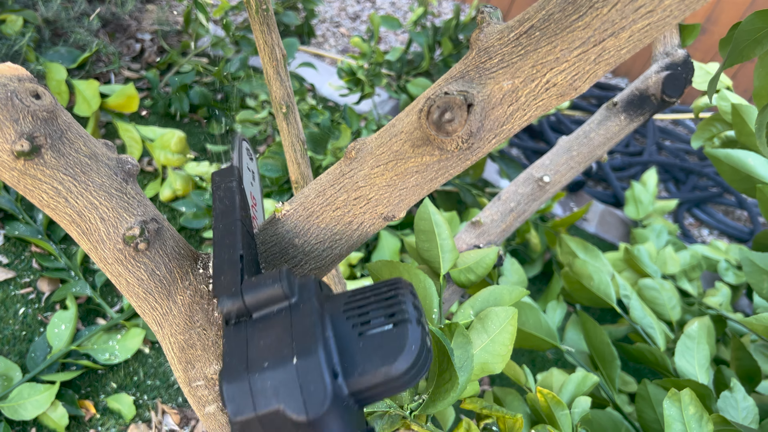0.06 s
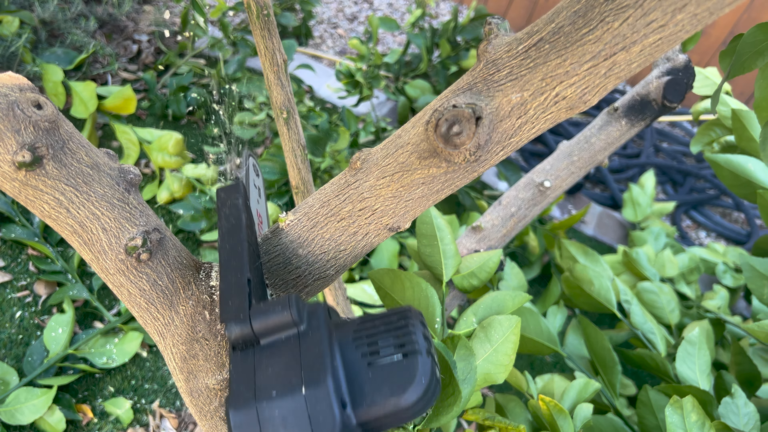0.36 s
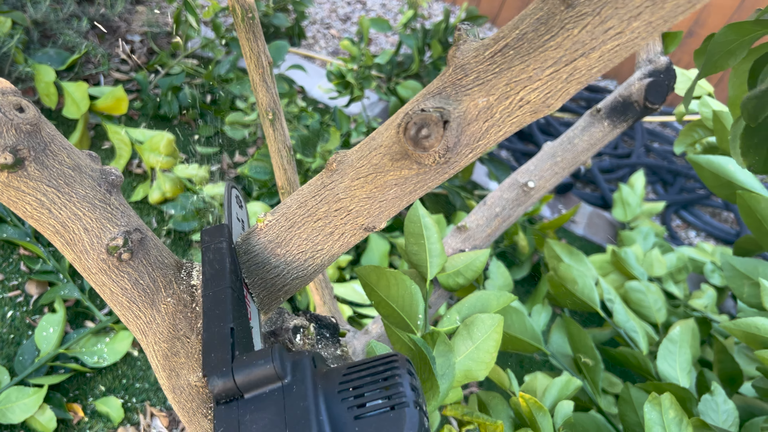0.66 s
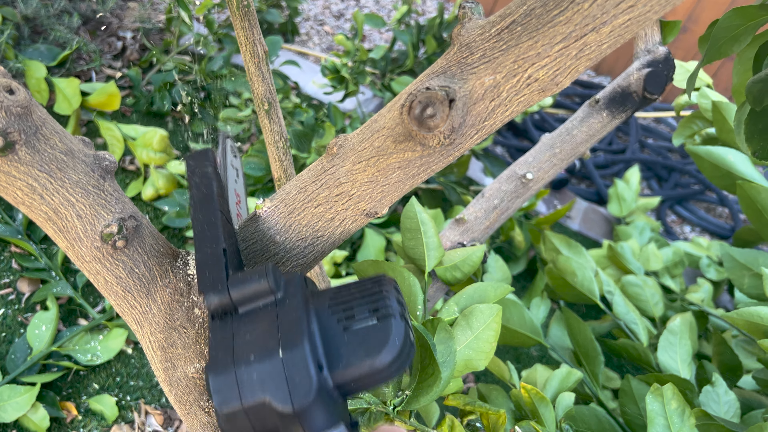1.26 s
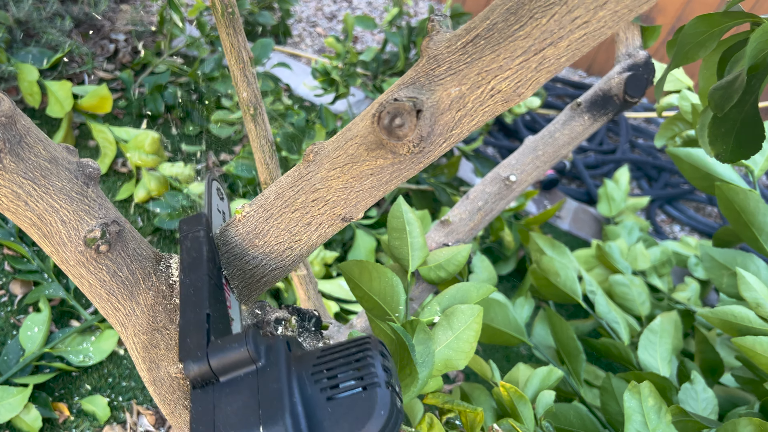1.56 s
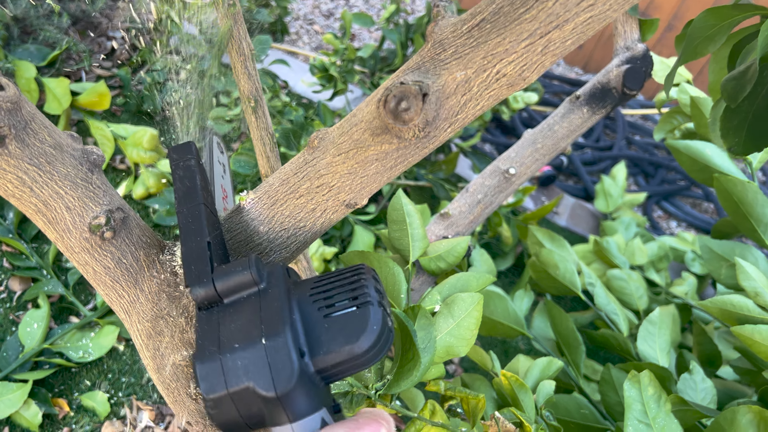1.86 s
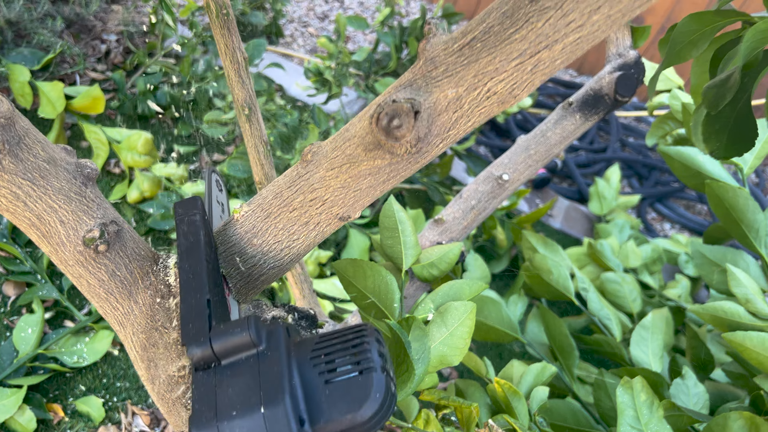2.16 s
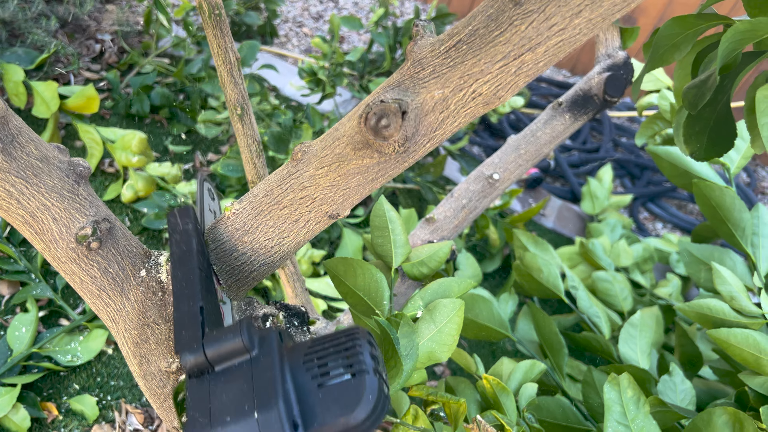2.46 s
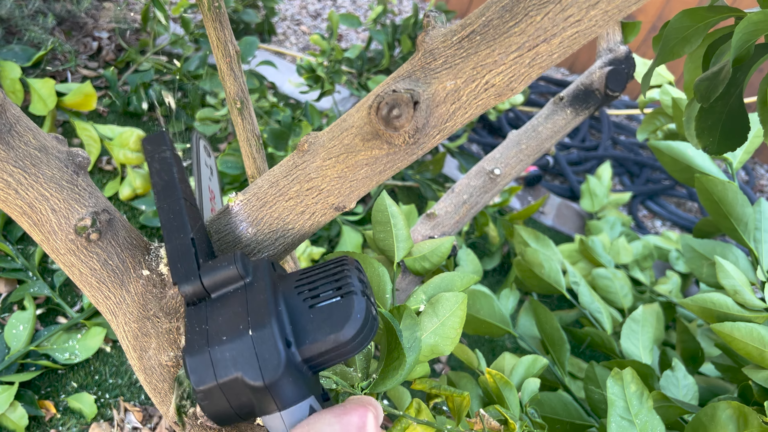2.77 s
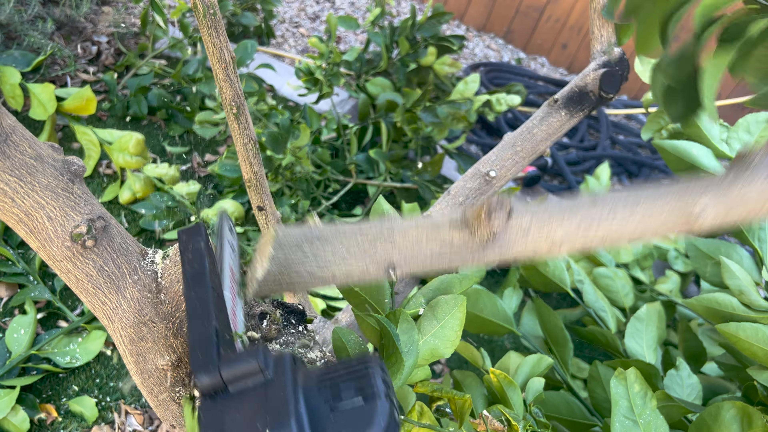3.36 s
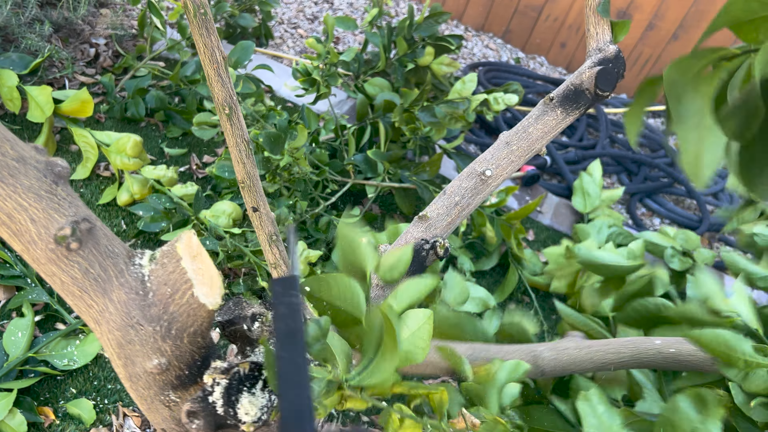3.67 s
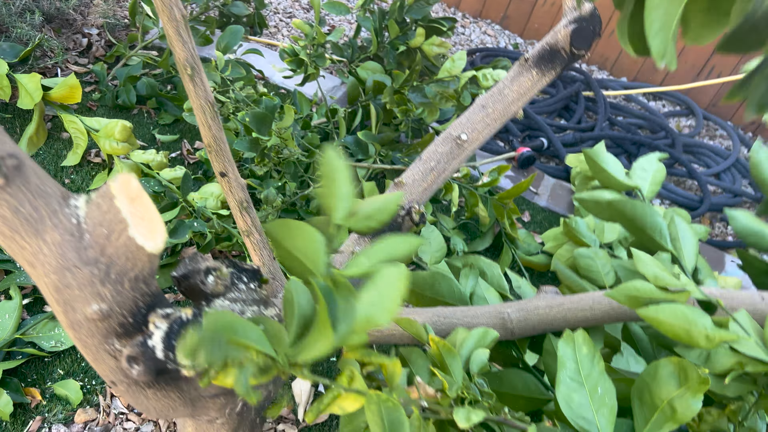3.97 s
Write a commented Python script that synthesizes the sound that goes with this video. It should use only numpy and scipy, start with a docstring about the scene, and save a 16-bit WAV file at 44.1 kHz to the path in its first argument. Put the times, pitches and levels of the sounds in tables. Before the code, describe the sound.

A small electric chainsaw rasps through a branch, which cracks and drops with a knock.

```python
"""Electric chainsaw cutting a branch

Close by in a garden, the chain of a small saw rattles round its bar. The cutters bite about thirty
times a second; each bite rasps, jolts the saw and drags the gear whine down. The last fibres crack,
the chain runs free and coasts down, and the branch drops with a hollow knock."""
import sys
import numpy as np
from scipy import signal
from scipy.fft import rfft, irfft, next_fast_len
from scipy.io import wavfile

SR = 44100
rng = np.random.default_rng(int(sys.argv[2]) if len(sys.argv) > 2 else 0)


def inscribe(sig):
    """Save sig as 16-bit PCM at rate SR to the path in sys.argv[1].

    A 1-D sig is mono; a 2-D sig holds one channel per row.
    Samples are clipped to [-1, 1] before scaling.
    """
    pcm = np.round(np.clip(np.atleast_2d(sig).T, -1, 1) * 32767)
    wavfile.write(sys.argv[1], SR, pcm.astype(np.int16))


N = 176400
T = np.arange(N) / SR
SIZE = next_fast_len(N + 8192)
HZ = np.fft.rfftfreq(SIZE, 1 / SR)
THROUGH_S, RELEASE_S = 3.385, 0.032  # end of the cut; fade of the load just before it


def amp(db):
    """Decibels to amplitude ratio."""
    return 10 ** (np.asarray(db) / 20)

def unit(x):
    """Normalisation to rms 1."""
    return x / np.sqrt(np.mean(x ** 2) + 1e-20)

def curve(rows, column=1):
    """Linear interpolation of a time table at every sample."""
    rows = np.array(rows)
    return np.interp(T, rows[:, 0], rows[:, column])

def per_bin(points):
    """Interpolation of a table over log frequency."""
    hz, value = np.transpose(points)
    return np.interp(np.log(HZ + 1), np.log(hz + 1), value)

def filtered(x, gain):
    """Filtering as multiplication of the spectrum."""
    return irfft(rfft(x, SIZE) * gain, SIZE)[..., :N]

def colour(x, spectrum):
    """Spectral shaping, at rms 1."""
    return unit(filtered(x, amp(per_bin(spectrum))))

def wander(hz):
    """Low-pass noise: a smooth random fluctuation of rms 1."""
    return unit(filtered(rng.standard_normal(N), np.exp(-(HZ / hz) ** 2)))

def clicks(per_s, spread_db):
    """Shot noise: two independent trains of uneven impulses."""
    size = amp(spread_db * np.minimum(rng.exponential(1, (2, N)), 5))
    return unit(size * rng.choice([-1, 1], (2, N)) * (rng.random((2, N)) < per_s / SR))

def strikes(times, sizes, shape):
    """Convolution: each impulse sets off the same response."""
    train = np.zeros(N)
    np.add.at(train, np.clip(np.round(np.asarray(times) * SR).astype(int), 0, N - 1), sizes)
    return signal.fftconvolve(train, shape[:SR // 2])[:N]

def burst(rise_s, decay_s):
    """Linear attack and exponential decay."""
    return np.minimum(T / rise_s, 1) * np.exp(-np.maximum(T - rise_s, 0) / decay_s)

def arch(length_s):
    """A rounded pulse from 0 to 1 and back."""
    return np.sqrt(abs(np.sin(np.pi * np.minimum(T / length_s, 1))))

def ring(hz, db, t60, rise_s):
    """Free vibration of one damped mode."""
    return amp(db) * burst(rise_s, t60 / np.log(1000)) * np.sin(2 * np.pi * hz * T)

def resonate(x, hz, width_hz):
    """Forced vibration of a resonator with moving centre frequency, at rms 1."""
    carrier = np.exp(2j * np.pi * np.cumsum(hz) / SR)
    pole = np.exp(-np.pi * width_hz / SR)
    return unit((carrier * signal.lfilter([1 - pole], [1, -pole], x / carrier)).real)


# Spectrum of the garden air. Each row: frequency in Hz, relative level in dB.
AIR = [(20, -39), (55, -8.5), (110, 15), (250, -20), (1000, 13), (15000, -2)]

def garden_air(db=-48.5):
    """Ambient sound as stationary coloured noise."""
    return amp(db) * colour(rng.standard_normal((2, N)), AIR)


# The branch lands and rocks. Each row: start in seconds, level in dB.
KNOCKS = [(3.6448, -18), (3.713, -47)]
# Its modes. Each row: frequency in Hz, level in dB, T60 in seconds, rise in seconds.
BRANCH_MODES = [(427, 3, 0.047, 0.0022), (354.7, -15, .04, 0.0014), (184, -9.5, 0.15, 0.0032),
                (88.5, -13, 0.12, 0.017), (805, -5, 0.027, 0.00083)]

def falling_branch():
    """Impact excites the damped modes of the cut limb."""
    times, db = np.transpose(KNOCKS)
    return strikes(times, amp(db), sum(ring(*mode) for mode in BRANCH_MODES))


# The hardest bites of the cutters. Each row: start in seconds, rasp in dB, chip hiss in dB.
HARD_BITES = [(0.067, -14, -22), (0.198, -22, -16.5), (0.27, -19.5, -20), (0.348, -19, -19),
              (0.545, -21, -30), (0.612, -18, -35), (0.685, -17, -22), (0.709, -17.5, -24),
              (0.763, -18, -29), (0.786, -16, -31), (0.888, -15.5, -29), (0.929, -11.5, -19),
              (0.978, -15, -30), (0.992, -15, -29), (1.002, -11, -27), (1.014, -15, -20),
              (1.14, -13.5, -23), (1.282, -17, -22), (1.344, -15, -31), (1.367, -16.5, -20),
              (1.393, -12, -24), (1.42, -15, -27), (1.475, -17, -21), (1.52, -17, -27), (2.001, -15.5, -33),
              (2.093, -18.5, -31), (2.27, -17, -29), (2.512, -14, -25), (2.52, -20, -22),
              (2.617, -18.5, -27), (2.879, -17, -19), (2.914, -15.5, -27), (3.011, -26, -19),
              (3.078, -18.5, -17.5), (3.112, -17, -19), (3.15, -22, -22), (3.218, -21.5, -28)]
SOFT_RASP_DB, SOFT_HISS_DB = -24, -33

def cutter_bites(rate_hz=30.84, jitter_s=0.0025, spread_db=2.5):
    """Quasi-periodic excitation: softer bites fill the gaps between the hard ones."""
    marks = [0] + [row[0] for row in HARD_BITES] + [THROUGH_S]
    grid = np.concatenate([np.linspace(start, end, max(round((end - start) * rate_hz), 1) + 1)[1:-1]
                           for start, end in zip(marks, marks[1:])])
    late_s, extra_db = (rng.standard_normal((200, 2))[:len(grid)] * [jitter_s, spread_db]).T
    soft_bites = np.transpose([grid + late_s, SOFT_RASP_DB + extra_db, SOFT_HISS_DB + extra_db])
    return np.vstack([HARD_BITES, soft_bites]).T


# Modes of the saw body. Each row: frequency in Hz, relative level in dB, T60 in seconds.
BODY_MODES = [(109.4, -21, 0.12), (69.5, -26, 0.12), (184, -26.5, 0.045)]
# The freed saw lurches in the hand. Each row: start in seconds, level in dB.
LURCHES = [(3.424, -14), (3.53, -17)]

def body_jolts(bite_s, rasp_db):
    """Impulse response of the saw body to each bite and lurch."""
    shake = sum(ring(*mode, rise_s=0.0077) for mode in BODY_MODES)
    jolt_db = SOFT_RASP_DB + 0.59 * (rasp_db - SOFT_RASP_DB)  # jolts vary less than the rasp
    lurch_s, lurch_db = np.transpose(LURCHES)
    return strikes(bite_s, amp(jolt_db), shake) + strikes(lurch_s, amp(lurch_db), shake)


# The last fibres crack; later the slowing chain gives one faint click.
# Each row: start in seconds, level in dB, decay in seconds.
CRACKS = [(3.409, -22.5, 0.0082), (3.418, -15, 0.0058), (3.926, -34, .002)]
# Spectra of rasping wood, torn chips and cracks. Each row: frequency in Hz, relative level in dB.
RASP_SPECTRUM = [(150, -29), (300, -15.5), (450, 2), (900, 2.5), (1250, 0.5), (1650, -7), (2000, -6),
                 (2400, -7), (3000, -13), (4500, -29), (15000, -4.5)]
CHIP_SPECTRUM = [(500, -36), (2000, -17), (2900, 13.5), (4500, -14), (7000, 12.5), (10500, -18.5),
                 (12500, -10), (15600, -0.5)]
CRACK_SPECTRUM = [(200, -15), (500, 0.5), (1300, 6), (2400, -13), (8000, -2.5), (15000, -13)]
RASP_GAIN_DB, HISS_GAIN_DB, TEAR_RISE_S, HISS_LEAD_S = -3, -2.5, 0.0016, 0.0023

def tearing_wood(bite_s, rasp_db, hiss_db, cutting):
    """Fracture noise: bites tear fibres and spray chips, the last fibres snap; a chain click follows."""
    rasp = strikes(bite_s, amp(rasp_db), burst(TEAR_RISE_S, decay_s=0.0041))
    rasp += 0.38 * amp(SOFT_RASP_DB) * cutting  # steady scrape
    hiss = strikes(bite_s - HISS_LEAD_S, amp(hiss_db), burst(rise_s=0.005, decay_s=0.011))
    hiss += amp(-42.5) * cutting  # steady spray
    crack = sum(strikes([start], amp(db), burst(TEAR_RISE_S, decay)) for start, db, decay in CRACKS)
    layers = [(amp(RASP_GAIN_DB) * rasp, RASP_SPECTRUM), (amp(HISS_GAIN_DB) * hiss, CHIP_SPECTRUM),
              (crack, CRACK_SPECTRUM)]
    return sum(colour(force * clicks(per_s=9000, spread_db=1.5), spectrum) * np.sqrt(np.mean(force ** 2))
               for force, spectrum in layers)


# Housing resonances. Each row: frequency in Hz, bandwidth in Hz, level in dB.
HOUSING_MODES = [(2028, 117, -17.5), (2846, 140, -19), (1227, 144, -19), (8640, 570, -24.5)]

def housing_gain(at_hz):
    """Modal superposition gives the housing's magnitude response."""
    return abs(sum(amp(db) / (1 + 2j * (at_hz - hz) / width) for hz, width, db in HOUSING_MODES))


# The ring drifts sharp in the cut and sinks as the saw coasts. Each row: time in seconds, pitch ratio.
RING_DRIFT = [(0, 0.942), (3.4, 1.016), (3.85, 0.955)]
# Spectrum of chain, bar and housing. Each row: frequency in Hz, relative level in dB.
CHAIN_SPECTRUM = [(90, -13.5), (260, -19), (480, -6), (780, -4), (1250, -5), (1720, -9.5), (2020, -3),
                  (2450, -6), (2850, -4), (3300, -3.5), (4400, -5), (7000, -3), (8000, -2), (10400, -0.0),
                  (11400, -0.5), (12600, -8), (15600, -8.5)]

def chain_rattle(link_phase, speed, level):
    """Impact noise: links clatter over sprocket and bar and excite the housing's resonances."""
    impacts = clicks(per_s=16000, spread_db=2.5) * (1 + 0.17 * np.cos(link_phase))
    impacts *= amp(1.35 * wander(hz=128))  # uneven slap
    rings = sum(amp(db) * resonate(impacts, hz * curve(RING_DRIFT), width)
                for hz, width, db in HOUSING_MODES)
    return level * (amp(2.5) * colour(impacts, CHAIN_SPECTRUM) + speed * rings)


# Hum of the chain. Each row: multiple of the link rate, level in dB.
HUM_HARMONICS = [(2, -40), (3, -41), (4, -38)]
SING_GAIN_DB, LOADED_GAIN_DB = 5.5, -13

def chain_hum(link_hz, link_phase, speed, level, cutting):
    """Periodic forcing makes harmonics; the upper ones swell as they cross the housing's resonances."""
    hum = sum(amp(db) * np.sin(k * link_phase) for k, db in HUM_HARMONICS)
    hum *= (level / np.median(level)) ** 2
    overtones = sum(housing_gain(k * link_hz) * np.sin(k * link_phase) for k in range(5, 10))
    sing = amp(SING_GAIN_DB) * level * speed * overtones
    return (hum + sing) * amp(LOADED_GAIN_DB * cutting)


TEETH_PER_LINK = 10

def coasting_gears(link_hz, link_phase, speed, level, cutting):
    """The mesh tone glides down through the housing's resonances as the freed saw slows."""
    tone = np.sqrt(housing_gain(TEETH_PER_LINK * link_hz)) * np.sin(TEETH_PER_LINK * link_phase)
    slowing = speed * (1 - speed ** 8)  # zero at full speed and at rest
    return amp(9) * level * tone * slowing * (1 - cutting)


# The free chain crosses the sprocket. Each row: time in seconds, link rate in Hz.
FREE_LINK_RATE = [(3.38, 362), (3.55, 395), (3.62, 382), (3.72, 287), (3.83, 189), (3.97, 125)]
# Envelope of the chain's sound. Each row: time in seconds, level in dB.
CHAIN_LEVEL = [(0.0, -25.5), (0.96, -23.5), (1.12, -25.5), (1.38, -23.5), (1.76, -26.5), (2.15, -24.5),
               (2.8, -25.5), (3.15, -25), (3.6, -26), (3.92, -35), (4.0, -48)]

def chain_drive(mesh_hz, cutting):
    """A fixed gear ratio ties the link rate to the mesh frequency; after the cut the chain coasts."""
    free_hz = curve(FREE_LINK_RATE) * (1 + 0.0083 * wander(hz=97))
    link_hz = cutting * mesh_hz / TEETH_PER_LINK + (1 - cutting) * free_hz
    link_phase = 2 * np.pi * np.cumsum(link_hz) / SR
    speed = np.minimum(link_hz / np.median(link_hz), 1)
    level = amp(curve(CHAIN_LEVEL))
    hum = chain_hum(link_hz, link_phase, speed, level, cutting)
    coast = coasting_gears(link_hz, link_phase, speed, level, cutting)
    return hum + coast, chain_rattle(link_phase, speed, level)


def rough_tone(phase, depth=0.7, rate_hz=300):
    """Random modulation by uneven teeth spreads a tone into sidebands."""
    return (1 + depth * wander(rate_hz)) * np.sin(phase) + depth * wander(rate_hz) * np.cos(phase)


# The gear mesh under load. Each row: time in seconds, frequency in Hz, level in dB.
GEAR_MESH = [(0, 3566, -41), (.11, 3575, -27), (.2, 3620, -29), (.42, 3627, -32), (.52, 3808, -34),
             (.86, 3920, -32), (.98, 3660, -35), (1.15, 3638, -28), (1.42, 3637, -32), (1.52, 3580, -30),
             (1.68, 3715, -31), (1.75, 3443, -35), (1.87, 3706, -31.5), (2.15, 3680, -34),
             (2.35, 3893, -31.5), (2.75, 3720, -36.5), (3.2, 3717, -34), (3.35, 3920, -27)]
# The chain snags in the cut. Each row: start in seconds, drop of the mesh frequency in Hz.
SNAGS = [(0.026, 497), (0.129, 384), (0.163, 624), (0.199, 476), (0.231, 476), (1.078, 397), (1.19, 599),
         (1.221, 848), (1.662, 300), (1.727, 804), (1.793, 584), (1.905, 450), (1.994, 550), (2.703, 320),
         (2.732, 280), (2.765, 250), (2.794, 449), (2.826, 150), (2.876, 604), (2.907, 452), (2.941, 180)]
SNAG_S, RECOVER_S, SQUEAL_DB, BITE_SAG_HZ = 0.0125, 0.015, -25.5, 109.76

def gear_whine(bite_s, cutting):
    """Load modulates the mesh frequency: bites pull it flat; snags make it squeal, then choke it."""
    snag_s, drop_hz = np.transpose(SNAGS)
    pull = np.interp(T, [0, SNAG_S, SNAG_S + RECOVER_S], [0, 1, 0])
    sag_hz = strikes(snag_s, drop_hz, pull) + strikes(bite_s, BITE_SAG_HZ, pull)
    mesh_hz = (curve(GEAR_MESH) - sag_hz) * (1 + 0.0085 * wander(hz=910))
    phase = 2 * np.pi * np.cumsum(mesh_hz) / SR
    squeal = strikes(snag_s, 0.83, arch(SNAG_S))
    choke = strikes(snag_s + SNAG_S, 0.76, arch(RECOVER_S))
    chatter_db = 2.5 * wander(hz=110)
    held = amp(curve(GEAR_MESH, column=2) + chatter_db) * (1 - choke)
    level = held * (1 - squeal) + amp(SQUEAL_DB) * squeal
    fundamental = rough_tone(phase)
    octave = amp(-4.5 + 3.5 * wander(hz=45)) * rough_tone(2 * phase)
    return unit(fundamental + octave) * level * cutting, mesh_hz


# Likeness of the scattered sound at two ports. Each row: frequency in Hz, coherence from 0 to 1.
COHERENCE = [(80, 0.93), (1250, 0.92), (1700, 0.53), (2000, 0.68), (2550, 0.048), (3600, 0.43),
             (5000, 0.31), (6000, 0.13), (7200, 0.14), (8600, 0.91), (15000, 1)]
# Phase difference. Each row: frequency in Hz, lead of the left port in radians.
PHASE_LEAD = [(80, -0.1), (400, -0.5), (1150, -0.4), (1550, -1.6), (2300, -9.3), (3600, -6.5), (4400, -6.6),
              (5700, -8.3), (6400, -6.4), (7400, -8.1), (8100, -7.4), (9100, -5.7), (10800, -2.8),
              (12900, 1.3), (15200, 6.1)]
# Level difference. Each row: frequency in Hz, left minus right in dB.
BALANCE = [(80, -0.5), (900, -2.5), (1600, -3), (2020, 3.5), (2420, -0.5), (2850, -2), (3250, -3.5),
           (3830, 0.5), (4900, -1.5), (7000, -2.5), (8500, -0.5), (15000, 0.0)]

def microphone_ports(direct, scattered):
    """Direct sound reaches two ports coherently, scattered sound with partial coherence."""
    coherence = np.clip(per_bin(COHERENCE), 0, 1)
    point = rfft(direct, SIZE)
    shared, separate = rfft(scattered, SIZE)
    left = point + shared
    right = point + coherence * shared + np.sqrt(1 - coherence ** 2) * separate
    right *= np.exp(-1j * per_bin(PHASE_LEAD))
    lean = amp(per_bin(BALANCE) / 2)
    return irfft(np.array([left * lean, right / lean]), SIZE)[:, :N]

def scene():
    """Superposition of saw, wood and falling branch in the open air."""
    bite_s, rasp_db, hiss_db = cutter_bites()
    cutting = np.clip((THROUGH_S - T) / RELEASE_S, 0, 1)  # 1 under load, 0 once free
    whine, mesh_hz = gear_whine(bite_s, cutting)
    drive_tones, rattle = chain_drive(mesh_hz, cutting)
    direct = falling_branch() + body_jolts(bite_s, rasp_db) + drive_tones + whine
    scattered = garden_air() + tearing_wood(bite_s, rasp_db, hiss_db, cutting) + rattle
    return microphone_ports(direct, scattered)

def record(dry):
    """Band limiting: a gentle low cut and a steep treble edge."""
    low_cut = signal.butter(2, 64, "high", fs=SR, output="sos")
    high_cut = signal.firwin(511, 15780, window=("kaiser", 9), fs=SR)
    return signal.oaconvolve(signal.sosfilt(low_cut, dry), high_cut[None], "same")


dry = scene()
out = record(dry)
inscribe(out)
```